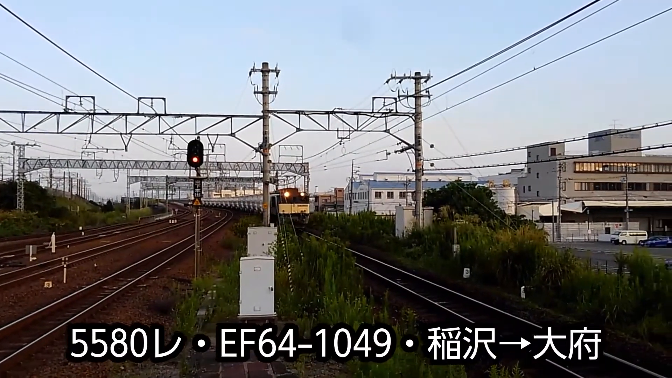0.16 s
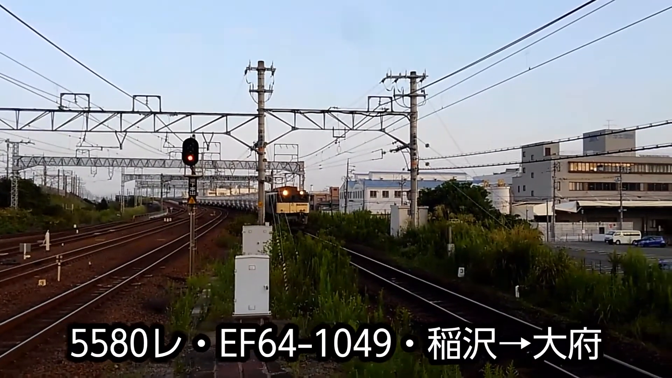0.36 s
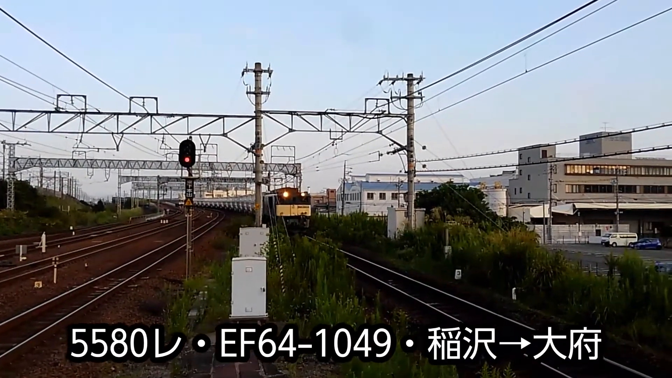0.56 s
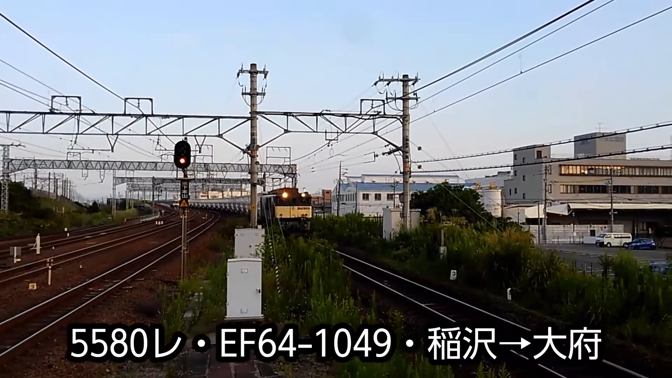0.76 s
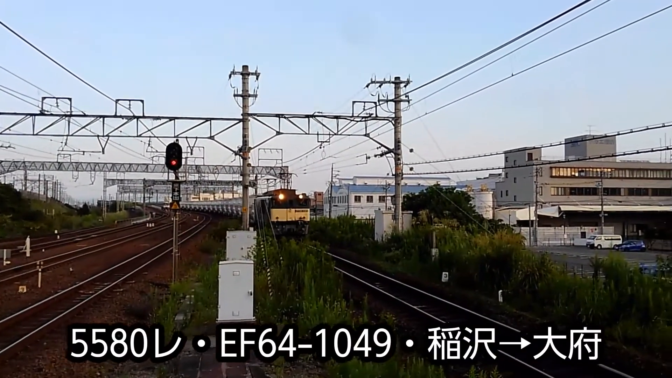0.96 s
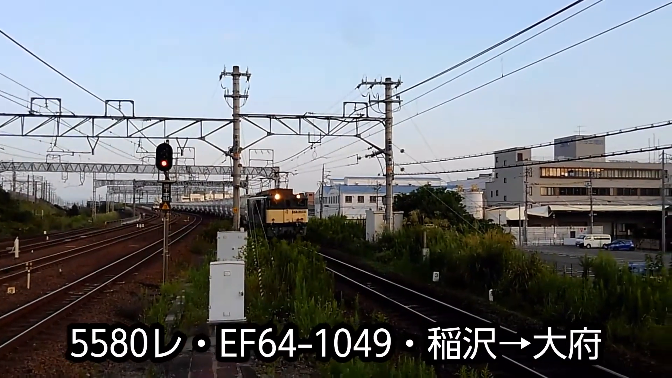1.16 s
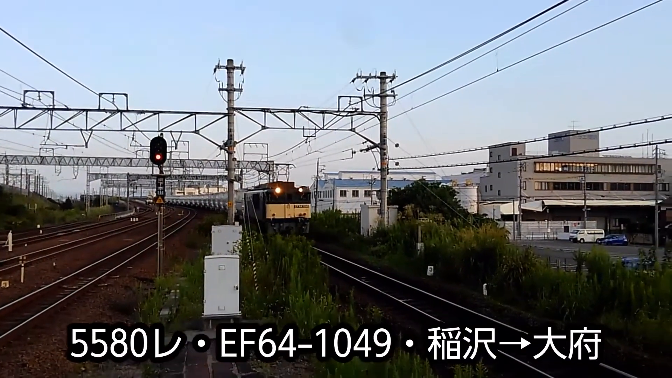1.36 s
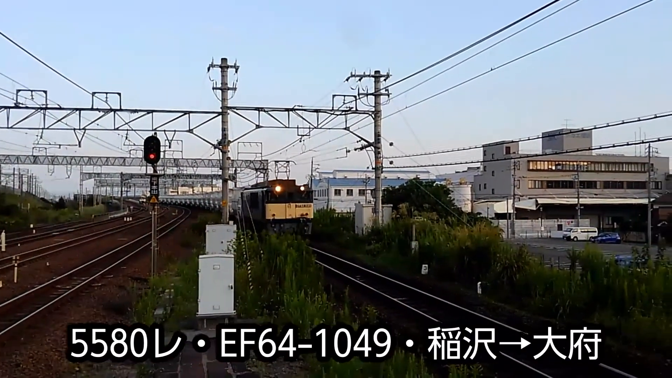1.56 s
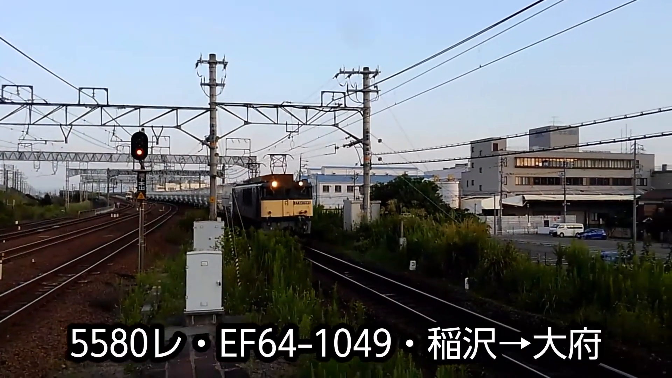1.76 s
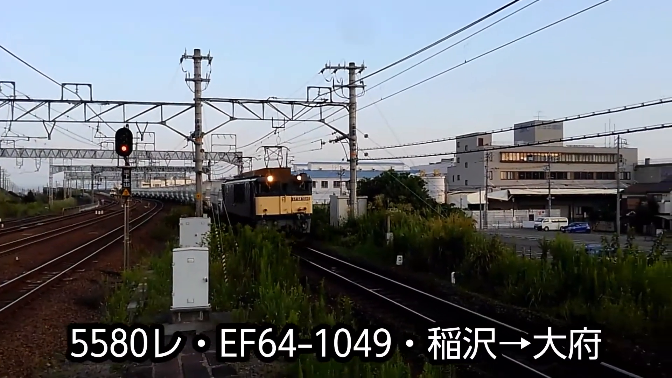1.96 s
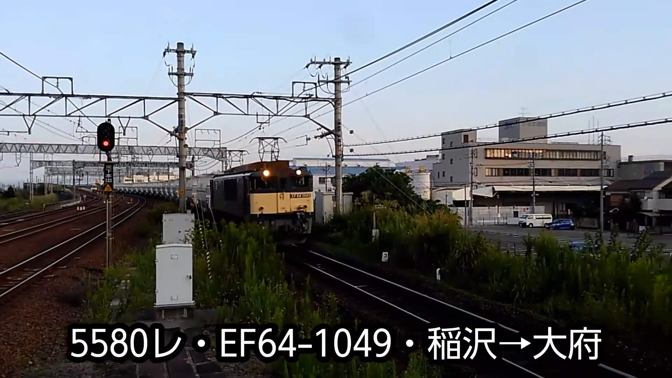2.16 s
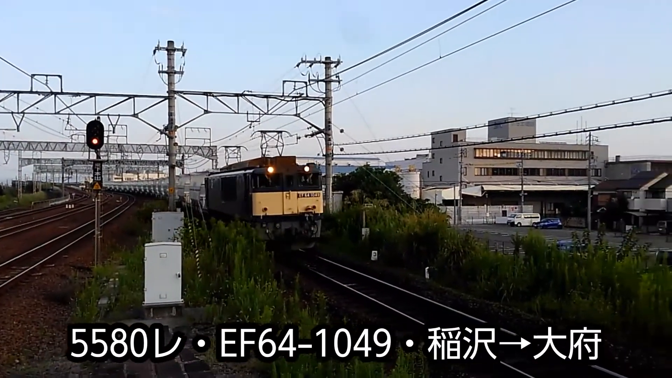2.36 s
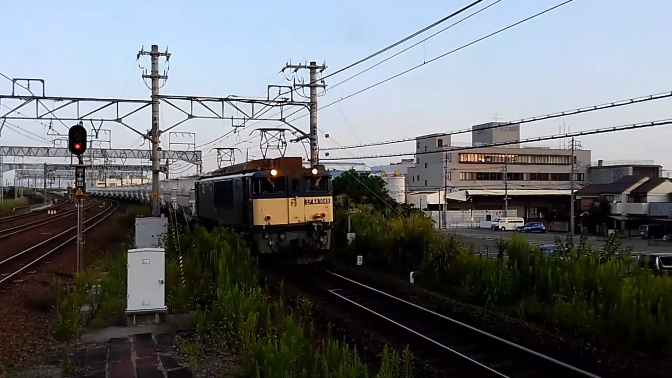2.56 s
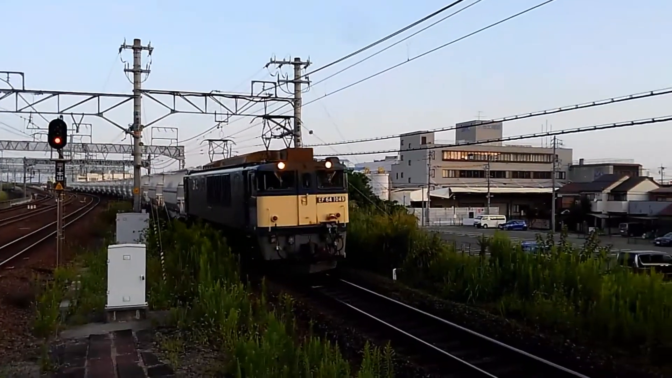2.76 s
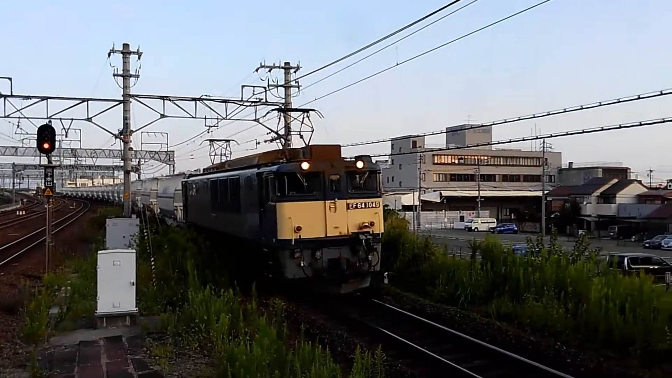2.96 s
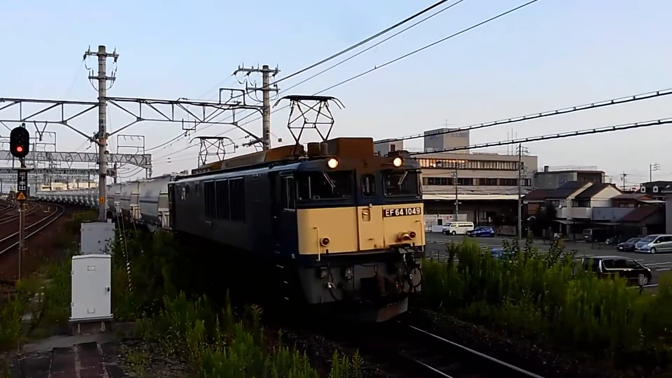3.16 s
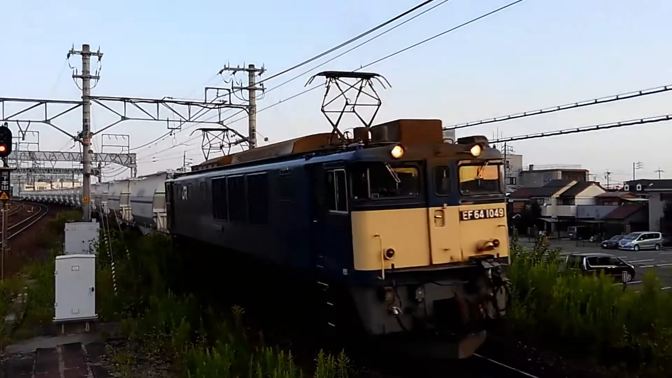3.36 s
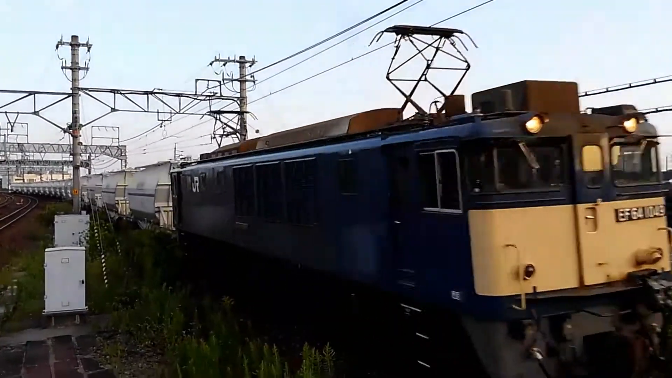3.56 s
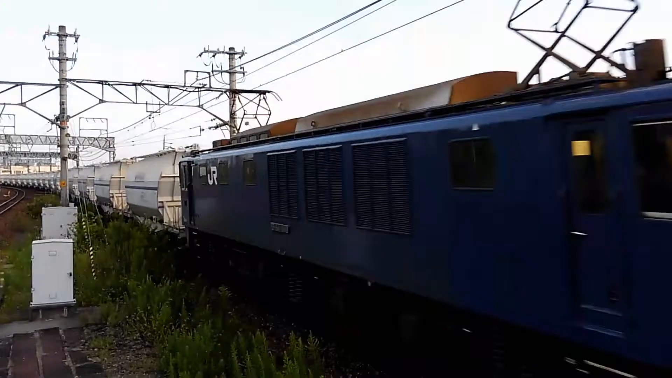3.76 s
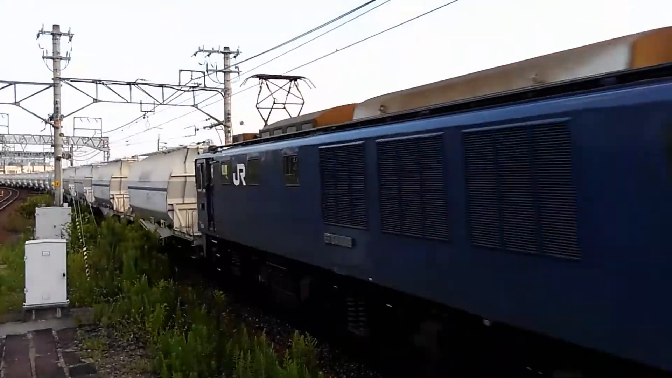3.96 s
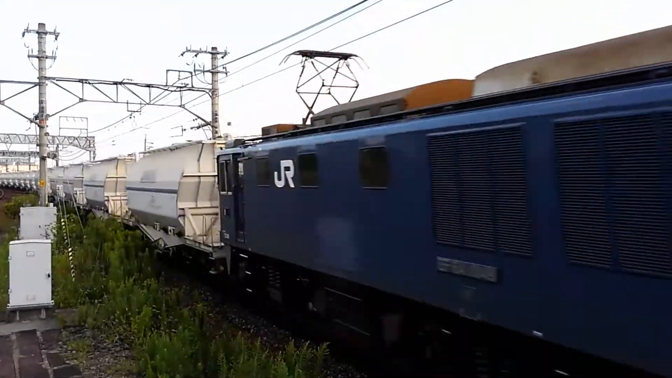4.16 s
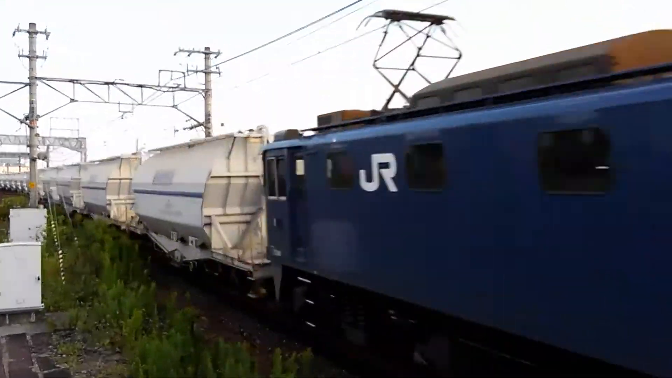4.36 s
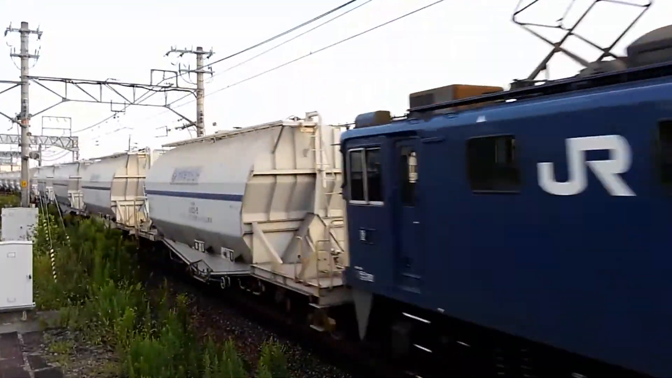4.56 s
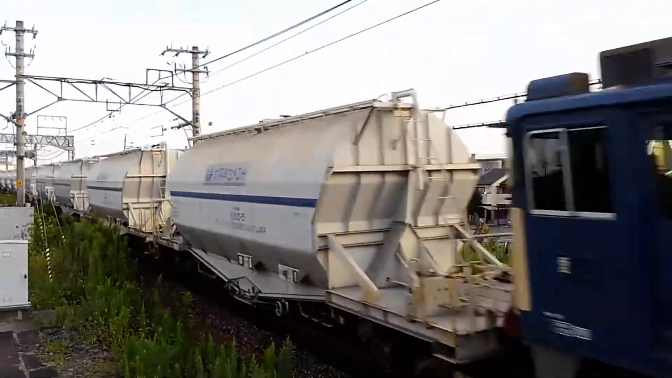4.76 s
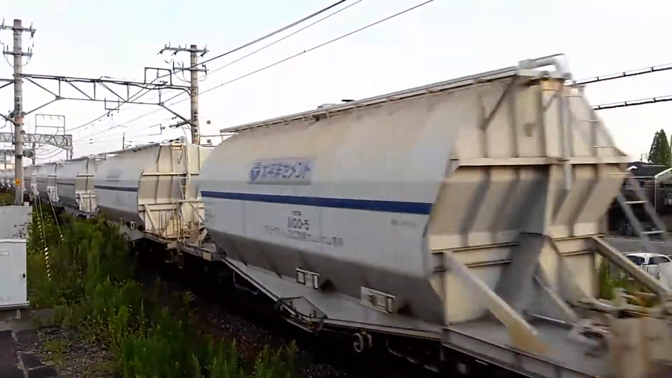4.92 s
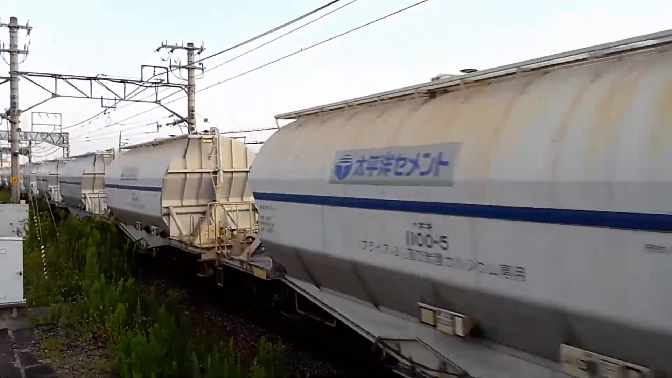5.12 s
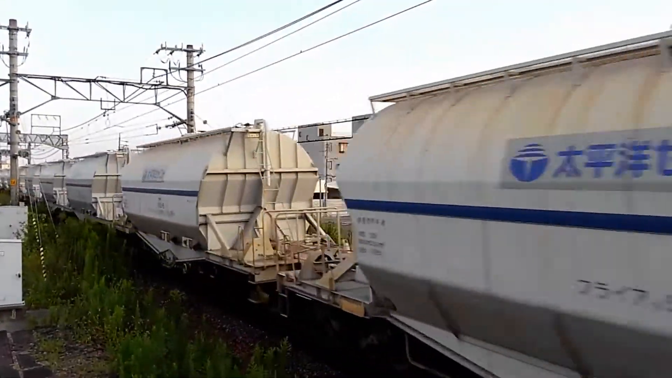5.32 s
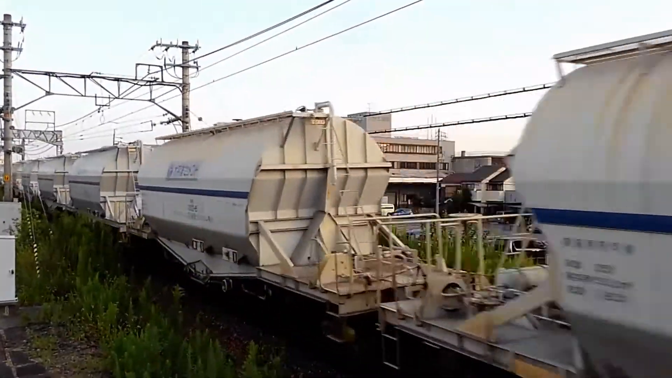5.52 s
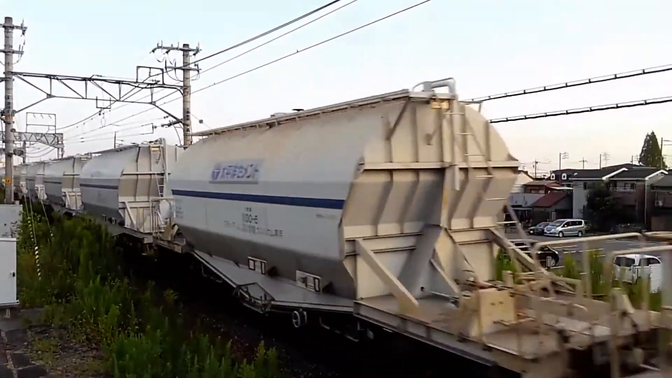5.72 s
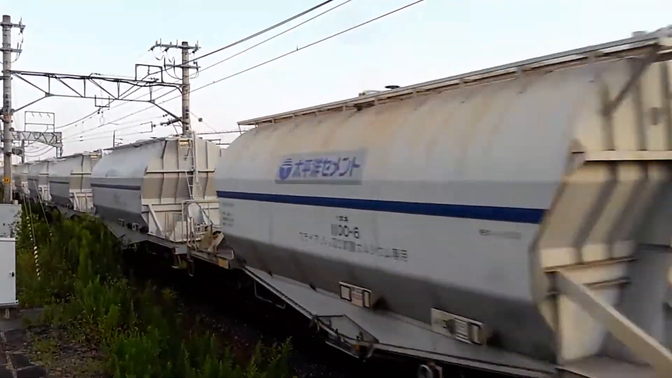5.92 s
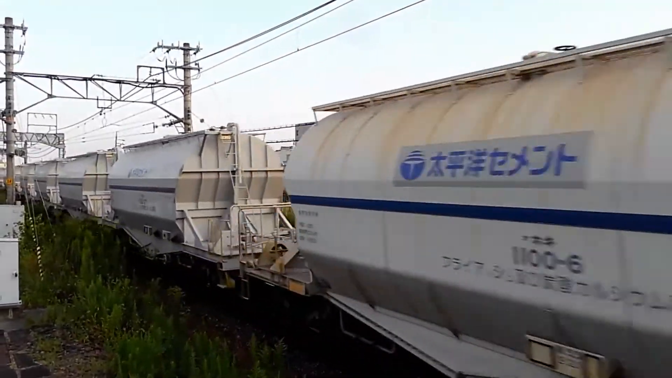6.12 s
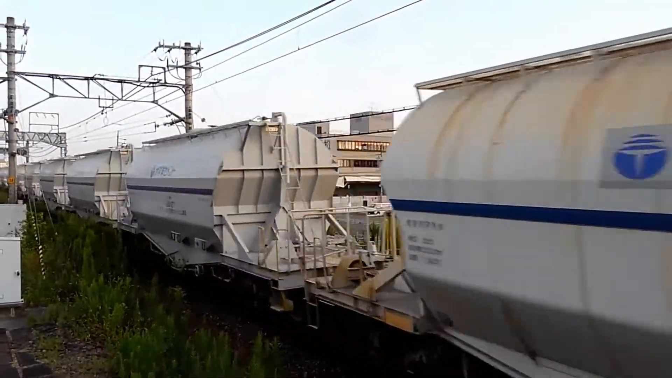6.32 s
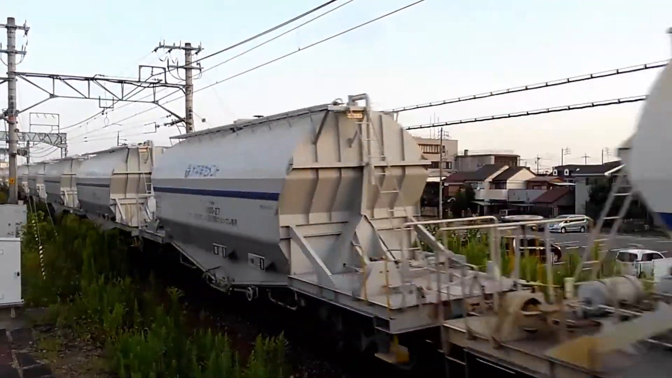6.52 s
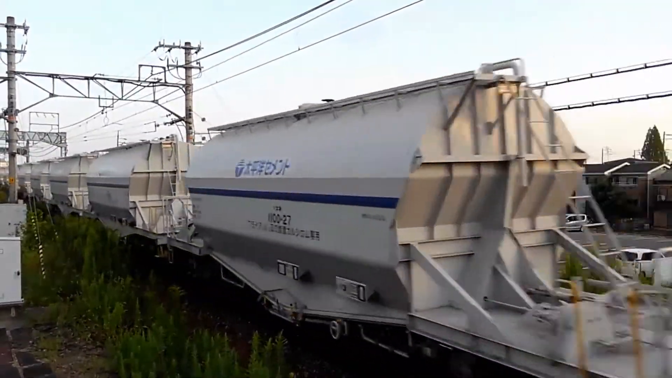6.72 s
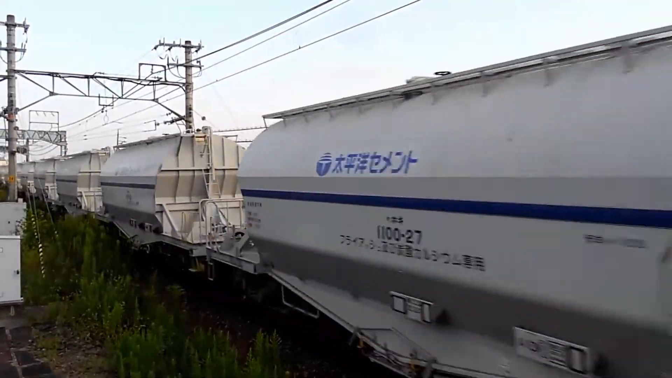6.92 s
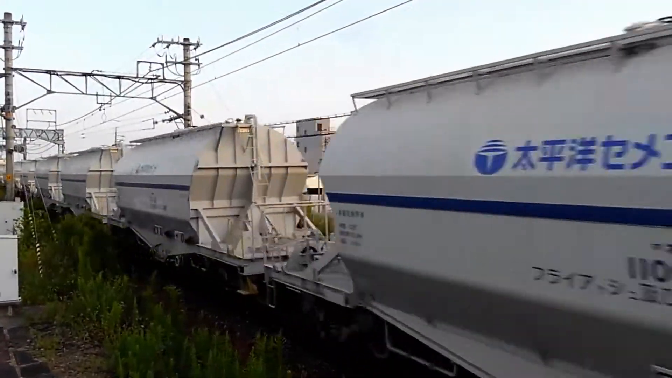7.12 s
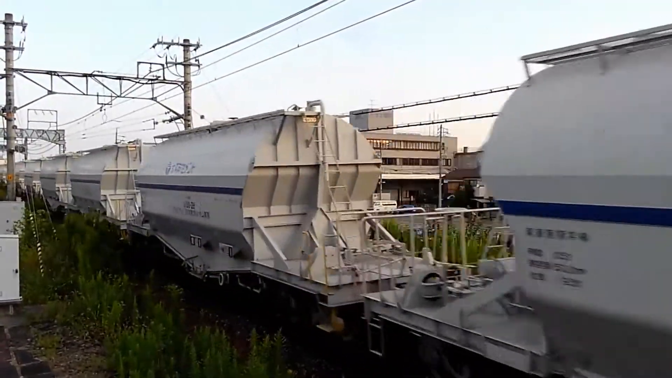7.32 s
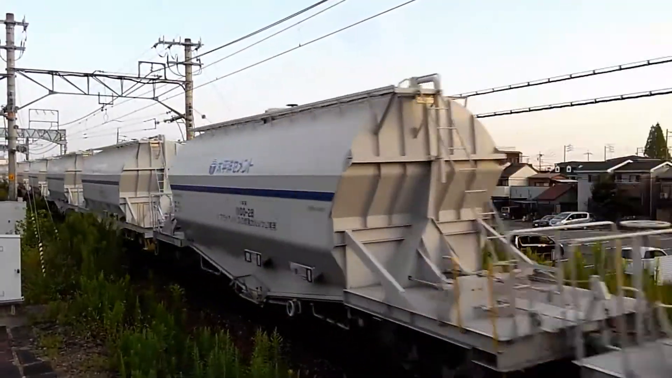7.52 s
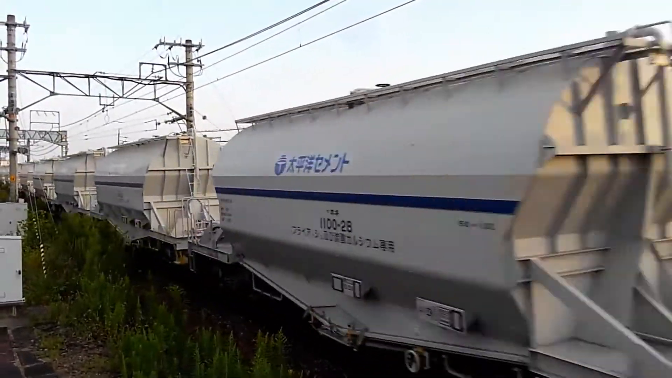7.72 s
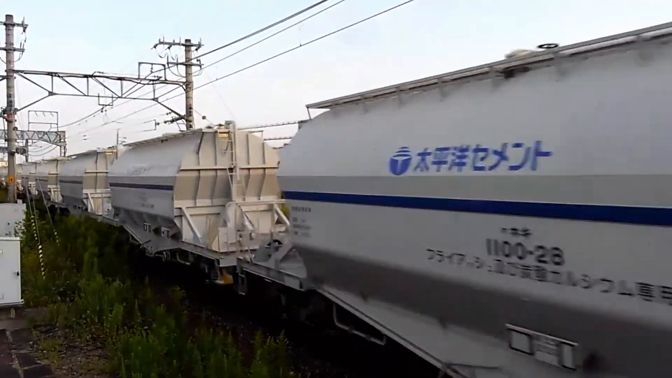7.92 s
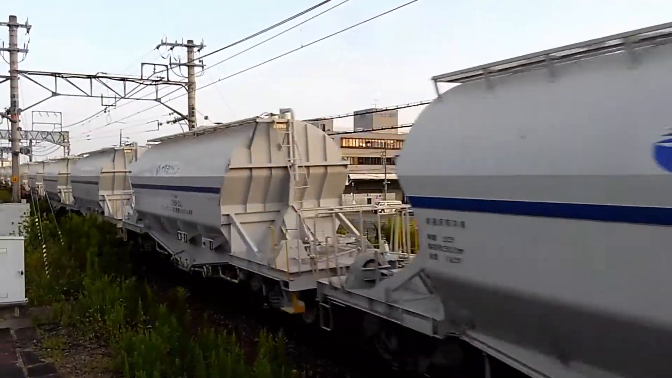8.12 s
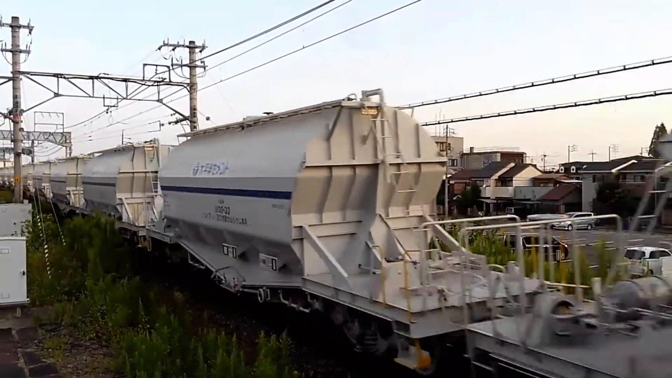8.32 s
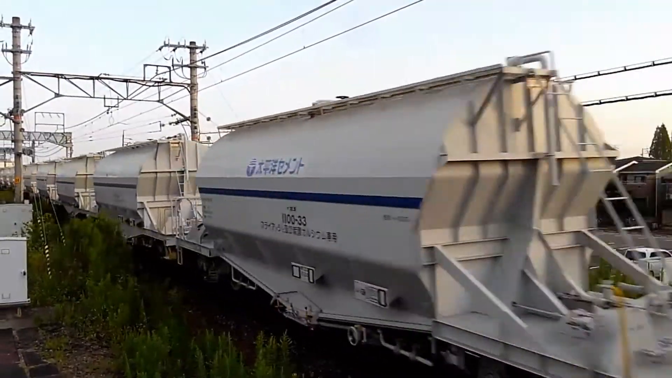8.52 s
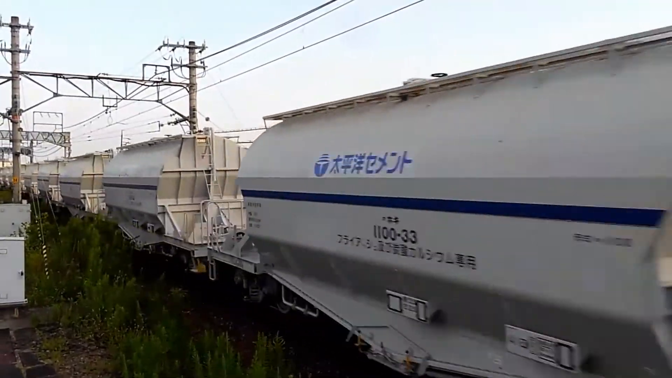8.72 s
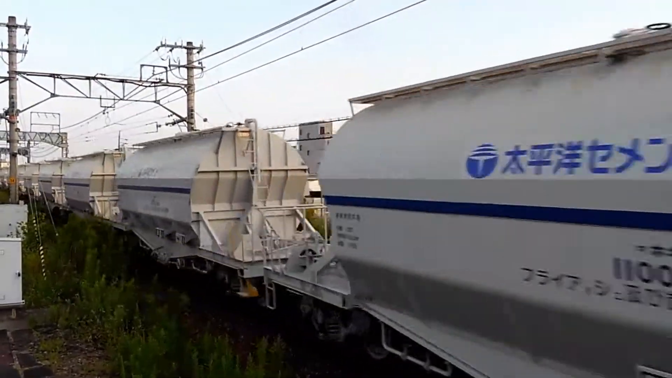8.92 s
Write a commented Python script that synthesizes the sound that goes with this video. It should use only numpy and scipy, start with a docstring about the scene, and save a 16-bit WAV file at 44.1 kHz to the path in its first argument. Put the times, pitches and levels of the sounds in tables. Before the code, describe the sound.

Outdoors beside a railway track, a distant rumble and wheel roar grow as an electric locomotive approaches. Its loud blower hum and motor whine sink in pitch as it passes a few metres from the microphone. Freight wagons follow in regular swells of roaring, ringing wheels and hollow drumming, with dull knocks, very faint squeaks and two thumps of air on the microphone.

```python
"""A distant rumble and the roar of wheels grow as an electric locomotive hauls cement wagons up to a platform.
It passes a few metres away; the hum of its cooling blowers sinks in pitch by the Doppler effect.
Rough wheels roar and ring on the rails, swelling with each pair of bogies, and flanges squeak faintly.
The wagon bodies drum, their running gear knocks, and their slipstream thumps the microphone."""
import sys
import numpy as np
from scipy import signal
from scipy.fft import rfft, irfft, next_fast_len
from scipy.io import wavfile
from scipy.ndimage import uniform_filter1d, map_coordinates

SR = 44100
rng = np.random.default_rng(int(sys.argv[2]) if len(sys.argv) > 2 else 0)


def generate_wav(signal):
    """Clip the signal to [-1, 1] and save it as 16-bit WAV at the path in sys.argv[1]."""
    frames = np.transpose(np.atleast_2d(signal))
    scaled = np.clip(frames, -1, 1) * 32767
    pcm = np.round(scaled).astype(np.int16)
    wavfile.write(sys.argv[1], SR, pcm)


N = 400569
TIME = np.arange(N) / SR
TRAIN_M_PER_S, SOUND_M_PER_S = 12.5, 343
PASS_S = 4.5  # the locomotive draws abreast

# the locomotive's end bogies, then those of neighbouring wagons in pairs:
# abreast t/s, roar level/dB, hiss level/dB, drumming level/dB
BOGIES = [(4.18, -38, -58.5, -31), (4.92, -36, -57, -31.5), (6.05, -40.5, -57.5, -28.5),
          (6.94, -39.7, -57.5, -31.5), (7.78, -38.5, -56.5, -30.5), (8.7, -38.5, -57.5, -30.5)]


def amp(db):
    """Amplitude ratio of a level in decibels."""
    return 10 ** (np.asarray(db) / 20)


def unit(x):
    """Normalisation to rms 1."""
    return x / np.sqrt(np.mean(x ** 2) + 1e-20)


def wobble(rate):
    """Smooth random modulation, with rate knots a second."""
    return map_coordinates(rng.standard_normal(int(N * rate / SR) + 4), [TIME * rate])


def filtered(x, response):
    """Linear filtering: the spectrum of x times a frequency response."""
    size = next_fast_len(N + SR // 2)
    return irfft(rfft(x, size) * response(np.fft.rfftfreq(size, 1 / SR)), size)[:N]


def coloured(x, spectrum):
    """Spectral shaping by points (f/Hz, level/dB) on a log frequency axis, at rms 1."""
    f, db = np.transpose(spectrum)
    return unit(filtered(x, lambda hz: amp(np.interp(np.log(hz + 1), np.log(f), db))))


def resonate(x, modes):
    """Forced response of superposed modes (f/Hz, width/Hz, level/dB), at rms 1."""
    def response(f):
        return sum(amp(db) / (1 + 1j * (f * f - hz * hz) / (1.32 * width * f + 1e-9)) ** 2
                   for hz, width, db in modes)
    return unit(filtered(x, response))


def patchy(depth_db):
    """White noise modulated by random patches of gain in time and frequency."""
    spectra = signal.stft(rng.standard_normal(N), nperseg=1024)[2]
    patches = uniform_filter1d(rng.standard_normal(spectra.shape), size=4, axis=0)
    patches = uniform_filter1d(patches, size=14, axis=1)
    return signal.istft(spectra * amp(depth_db * unit(patches)), nperseg=1024)[1][:N]


def handover(a, b, at_s, length_s):
    """Constant-power crossfade from a to b."""
    share = .5 + .5 * np.tanh((TIME - at_s) / length_s)
    return np.sqrt(1 - share) * a + np.sqrt(share) * b


def together(*levels):
    """Incoherent addition: unrelated sounds add in power; levels in dB."""
    return 10 * np.log10(sum(amp(db) ** 2 for db in levels))


def passing(abreast_s, peak_db, reach_m, fall_db):
    """Distance law: the level drops by fall_db (approaching, receding) per tenfold range."""
    along_m = TRAIN_M_PER_S * (TIME - abreast_s)
    return peak_db - np.where(along_m < 0, *fall_db) * np.log10(np.hypot(1, along_m / reach_m))


def procession(times, levels, reach_m):
    """Directivity: bogies radiate sideways, so the level of each falls fast once it has passed."""
    return together(*(passing(s, db, reach_m, fall_db=(40, 40)) for s, db in zip(times, levels)))


def doppler(abreast_s, distance_m):
    """Doppler effect: the radial speed of a source sets the ratio of heard to emitted frequency."""
    along_m = TRAIN_M_PER_S * (TIME - abreast_s)
    return 1 / (1 + TRAIN_M_PER_S / SOUND_M_PER_S * along_m / np.hypot(along_m, distance_m))


def repitched(x, ratio):
    """Time scaling multiplies every frequency in x by a changing ratio."""
    return map_coordinates(x, [np.cumsum(ratio)], mode="mirror")


def ground():
    """Ground vibration: the bed rumbles most under the heavy locomotive; only deep sound carries far."""
    # rumble spectra, far and near: f/Hz, level/dB
    far_spectrum = [(10, -16.5), (25, -4), (42, 4.5), (62, -3), (85, -7.5), (125, -16.5), (180, -21.5),
                    (310, -68)]
    near_spectrum = [(10, -15.5), (27, 5), (45, -1), (65, -1), (90, -2.5), (125, -5.5), (180, -25),
                     (310, -65)]
    locomotive_db = passing(abreast_s=4, peak_db=-30, reach_m=5, fall_db=(27, 25))
    train_db = passing(abreast_s=4, peak_db=-31, reach_m=5, fall_db=(10, 0))
    far = coloured(patchy(0.94), far_spectrum)
    near = coloured(patchy(0.6), near_spectrum)
    rumble = handover(far, near, at_s=3.23, length_s=0.79)
    return amp(together(locomotive_db, train_db) + 0.99 * wobble(9)) * rumble


def ticks():
    """Transients: noise with an exponential rise and decay is heard as ticks and brief scrapes."""
    # noise bursts: t/s, peak level/dB, rise/s, decay/s
    bursts = [(0.5681, -49, 0.00033, 0.00045), (7.685, -45, 0.018, 0.018), (7.86, -50, 0.016, .018)]
    envelope = sum(amp(db) * np.exp(np.minimum((TIME - s) / rise, (s - TIME) / decay))
                   for s, db, rise, decay in bursts)
    spectrum = [(500, 0), (1600, 12), (3000, 14), (4500, 5), (7000, -1), (13000, -10)]
    return envelope * coloured(rng.standard_normal(N), spectrum)


def flanges():
    """Friction on the curve makes the flanges squeak in faint, wavering tones."""
    # squeaks: t/s, peak level/dB, half length/s, f/Hz
    squeaks = [(6.93, -78, .06, 10750), (7.3, -73, .03, 10830), (7.39, -71, .03, 10900),
               (6.69, -61, 0.024, 5330), (6.96, -69, 0.044, 5460), (7.33, -69, .06, 5380)]
    waver_cycles = 30 * np.cumsum(wobble(150)) / SR
    out = np.zeros(N)
    for s, db, half, hz in squeaks:
        envelope = amp(db) * np.exp(-((TIME - s) / half) ** 2)
        out += envelope * np.sin(2 * np.pi * (hz * TIME + waver_cycles))
    return out


def eddies(core_s=0.0011):
    """The pressure field of a passing vortex sucks, then pushes at the microphone."""
    # slipstream vortices: t/s, level/dB, half length/s
    vortices = [(6.374, -11, 0.01), (8.939, -12, 0.01)]
    out = np.zeros(N)
    for s, db, half in vortices:
        t = TIME - s
        out += amp(db) * np.tanh(t / core_s) * np.exp(-(t / half) ** 2 / 2)
    return out


def knocks(rise_s=0.002, clatter_s=0.035):
    """Damped oscillation: each jolt dies quickly in the heavy frame while loose fittings rattle on."""
    # jolts of the running gear: t/s, level/dB, f/Hz, decay/s
    jolts = [(6.115, -13, 182, 0.011), (6.922, -13, 198, 0.0051), (7.024, -10.5, 171, 0.008),
             (7.929, -13, 173.5, 0.011), (8.827, -14.5, 176, 0.011), (8.934, -17.5, 233, 0.006)]
    rattle_spectrum = [(100, -13), (200, 3.5), (480, 6.0), (800, -15), (2000, -42), (5000, -120)]
    rattle = coloured(rng.standard_normal(N), rattle_spectrum)
    out = np.zeros(N)
    for s, db, hz, decay in jolts:
        t = TIME - s
        envelope = np.exp(np.minimum(t / rise_s, -t / decay))
        tail = np.exp(np.minimum(t / rise_s, -t / clatter_s))
        clatter = (amp(-26) * np.sqrt(envelope) + amp(-25) * tail) * rattle
        out += amp(db) * (envelope * np.cos(2 * np.pi * hz * t) + clatter)
    return out


def wagon_bodies():
    """Forced vibration: the wagon tanks drum with the shaking of their bogies."""
    # drumming spectrum: f/Hz, level/dB
    tank_spectrum = [(70, -3.5), (115, -4.5), (170, -1.5), (195, -1.5), (225, 3), (265, -8.5), (350, -9.5),
                     (440, -15.5), (600, -53), (1200, -86)]
    times, _, _, levels = np.transpose(BOGIES)
    level_db = procession(times, levels, reach_m=6.85) + 0.85 * wobble(7.6)
    return amp(level_db) * coloured(patchy(1.0), tank_spectrum)


def wheel_roar():
    """Rolling noise: rough steel on rail roars and excites the modes of the wheels."""
    # roar spectra of the far train, the near locomotive and the wagons: f/Hz, level/dB
    far_spectrum = [(250, -51), (420, -7), (484, 0), (510, -10), (531, -7.5), (638, -1), (743, 1),
                    (959, -4.5), (1070, -12.5), (1320, -5.5), (1560, -14.5), (1960, -12.5), (3840, -27),
                    (4120, -40), (4800, -56), (6240, -50), (10600, -120)]
    near_spectrum = [(250, -30), (420, 0), (465, -3), (559, -7.5), (714, -6), (875, -13), (959, -8.5),
                     (1110, -17.5), (1330, -14), (1530, -19), (1920, -21), (2380, -23.5), (3190, -25),
                     (3880, -31), (4800, -47), (6240, -79), (10600, -120)]
    wagon_spectrum = [(250, -32.5), (420, -4.5), (460, 2), (576, -5.5), (806, 0), (1010, -7.5), (1200, -10),
                      (1410, -11.5), (1680, -16.5), (2020, -14), (2470, -19), (2880, -20.5), (3260, -22),
                      (3760, -23.5), (4800, -39.5), (6240, -56), (10600, -120)]
    # wagon wheel resonances: f/Hz, width/Hz, level/dB
    wheel_modes = [(1434, 103, 2.5), (2100, 98, -5.5), (4030, 450, -17.5)]
    # the ring dips as the first bogies recede, then settles among the oncoming ones:
    # t/s, frequency ratio, level/dB
    ring_course = [(4.5, 0.88, -1), (5.15, 0.9, -3.5), (6.1, 0.92, -12), (6.7, 0.98, -10.5),
                   (7.6, 1.01, -13), (9.08, 0.96, -9)]
    ring_times, ratios, ring_levels = np.transpose(ring_course)
    ring = repitched(resonate(patchy(0.61), wheel_modes), np.interp(TIME, ring_times, ratios))
    ring *= amp(np.interp(TIME, ring_times, ring_levels))
    rims = amp(-14) * resonate(patchy(2.0), [(2822, 300, 0)])
    wagons = coloured(patchy(1.1), wagon_spectrum) + ring + rims
    far = coloured(patchy(0.33), far_spectrum)
    near = coloured(patchy(0.74), near_spectrum)
    approach = handover(far, near, at_s=3.46, length_s=0.37)
    times, levels, _, _ = np.transpose(BOGIES)
    far_db = -55.5  # the rest of the train, far up the line
    locomotive_db = passing(PASS_S, peak_db=-31.5, reach_m=4, fall_db=(23.5, 23.5))
    level_db = together(far_db, locomotive_db, procession(times, levels, reach_m=5.18))
    return amp(level_db + 0.14 * wobble(25)) * handover(approach, wagons, at_s=5.45, length_s=0.39)


def contact_hiss(far_db=-79.5):
    """High-frequency rolling noise: the contacts between wheel and rail hiss."""
    # hiss spectra, far and near: f/Hz, level/dB
    far_spectrum = [(2590, -20), (4400, -4.5), (6150, -9), (7490, -14), (9130, -21.5), (11300, -16),
                    (12700, -21), (13700, -12), (14300, -39)]
    near_spectrum = [(2590, -11), (4400, -3), (4740, -2.5), (6090, 0), (7800, -5), (9400, -15),
                     (11000, -11.5), (13700, -19), (14300, -19)]
    far = coloured(patchy(0.6), far_spectrum)
    near = coloured(patchy(1.0), near_spectrum)
    times, _, levels, _ = np.transpose(BOGIES)
    locomotive_db = passing(PASS_S, peak_db=-55, reach_m=6, fall_db=(22.5, 16))
    level_db = together(far_db, locomotive_db, procession(times, levels, reach_m=5.18))
    return amp(level_db + 0.39 * wobble(40)) * handover(far, near, at_s=2.5, length_s=0.75)


def rotor(hz, drift_hz, fading_db):
    """Rotation gives a tone; random fading stands for interference with its ground reflection."""
    phase = 2 * np.pi * np.cumsum(hz + drift_hz * wobble(12)) / SR
    return unit(amp(fading_db * wobble(8)) * np.sin(phase + 0.43 * wobble(25)))


def locomotive(blade_hz=239, twin_hz=231, second_hz=317.5):
    """Blade-passing tones of the blowers, motor whine and duct resonance, all Doppler shifted."""
    # brief surges and dips of the hum: t/s, level change/dB, half length/s
    swings = [(2.547, -6.5, 0.41), (3.37, 5.5, 0.05), (4.162, 4.5, 0.085), (4.255, -10, 0.029),
              (4.378, -20, 0.026), (4.46, 1.5, 0.047), (4.823, -2, 0.052)]
    # motor tones at rest: f/Hz, level/dB
    motor_tones = [(637, 0), (716, -2)]
    # air duct resonances at rest: f/Hz, width/Hz, level/dB
    duct_modes = [(176.4, 20, 1), (238.7, 16.3, 0), (321.3, 34.6, -4), (459, 49, -13.5)]
    # spectrum of the rushing air: f/Hz, level/dB
    air_spectrum = [(60, -54.5), (110, -2), (170, 0.5), (300, 6), (420, -12), (560, -20), (800, -2.5),
                    (1500, -73.5)]
    swing_db = sum(db * np.exp(-((TIME - s) / half) ** 2) for s, db, half in swings)
    ratio = doppler(abreast_s=4.66, distance_m=4.2)
    # a twin blower runs a little slower and beats against the main one
    twin = amp(-5.5) * rotor(twin_hz * ratio, drift_hz=2.2, fading_db=-1.5)
    hum = rotor(blade_hz * ratio, drift_hz=1.0, fading_db=0) + twin
    hum *= amp(passing(PASS_S, peak_db=-23, reach_m=4, fall_db=(27.5, 30.5)) + swing_db)
    octave = rotor(2 * blade_hz * ratio, drift_hz=2.64, fading_db=3.5)
    octave *= amp(passing(PASS_S, peak_db=-35, reach_m=1.7, fall_db=(20, 20)))
    second_hum = rotor(second_hz * ratio, drift_hz=1.56, fading_db=2)
    second_hum *= amp(passing(PASS_S, peak_db=-34, reach_m=6, fall_db=(28.5, 31)))
    whine = sum(amp(db) * rotor(hz * ratio, drift_hz=3.59, fading_db=3) for hz, db in motor_tones)
    whine *= amp(passing(PASS_S, peak_db=-40, reach_m=13, fall_db=(56, 67)))
    ducts = amp(-3.5) * resonate(patchy(1.0), duct_modes)
    rush = amp(-6) * coloured(patchy(0.69), air_spectrum)
    air_db = passing(PASS_S, peak_db=-21.5, reach_m=4.5, fall_db=(25, 22))
    air_db += 0.26 * swing_db + 1.5 * wobble(15)
    return hum + octave + second_hum + whine + amp(air_db) * repitched(ducts + rush, ratio)


def scene():
    """Superposition: the pressures of all the train's sources add in the open air."""
    train = locomotive() + wheel_roar() + contact_hiss() + ground() + wagon_bodies()
    return (train + knocks() + eddies() + ticks() + flanges())[None]


def record(dry, top_hz=14300):
    """Band limiting: an ideal low-pass filter removes everything above top_hz."""
    return filtered(dry[0], lambda hz: hz < top_hz)[None]


dry = scene()
out = record(dry)
generate_wav(out)
```